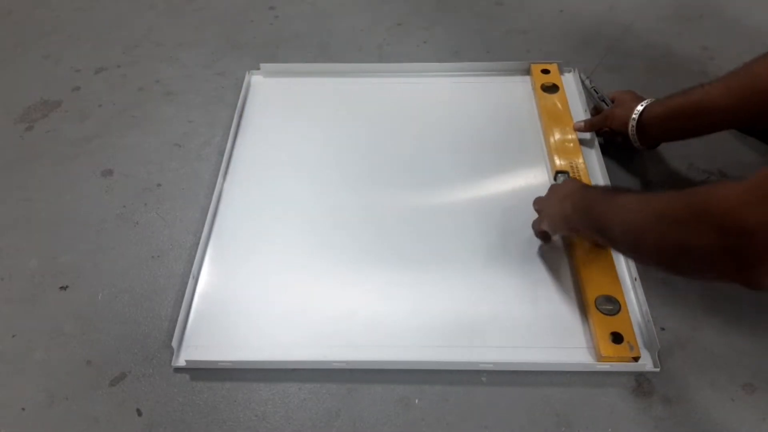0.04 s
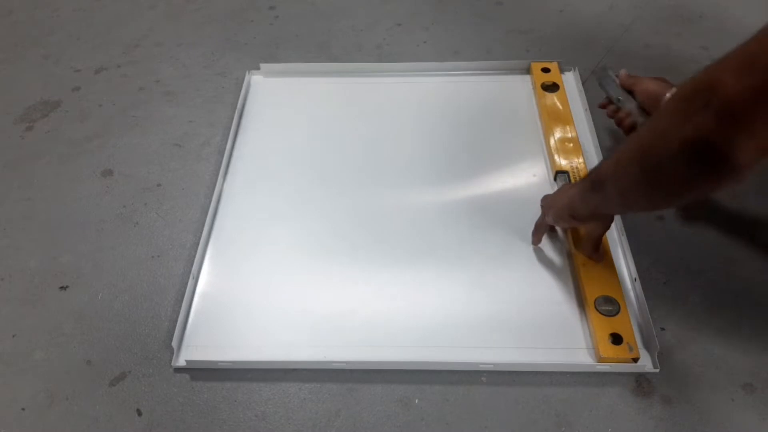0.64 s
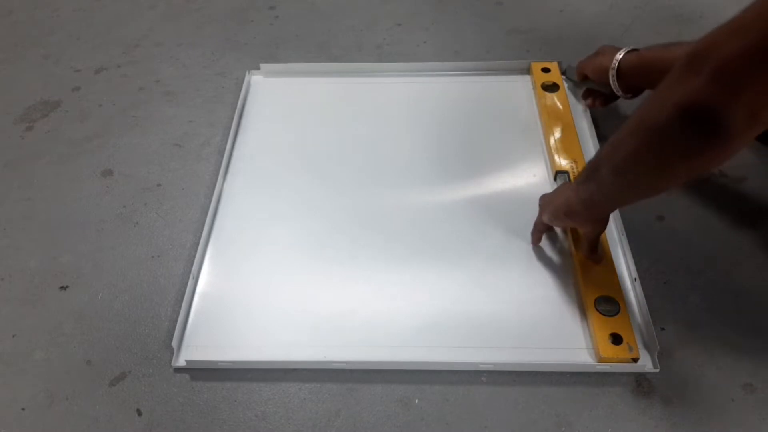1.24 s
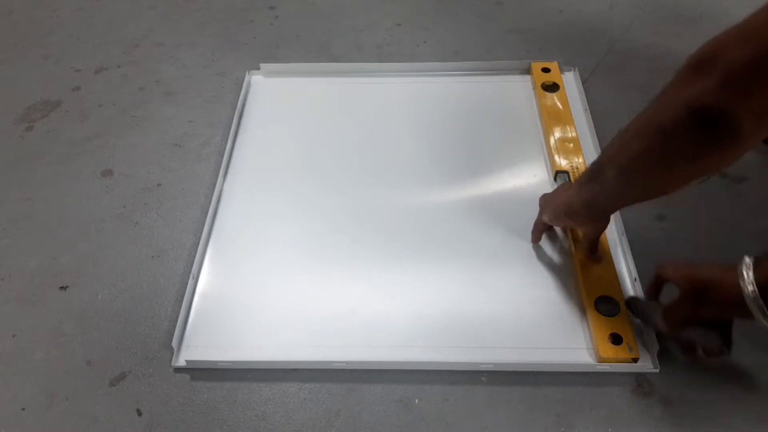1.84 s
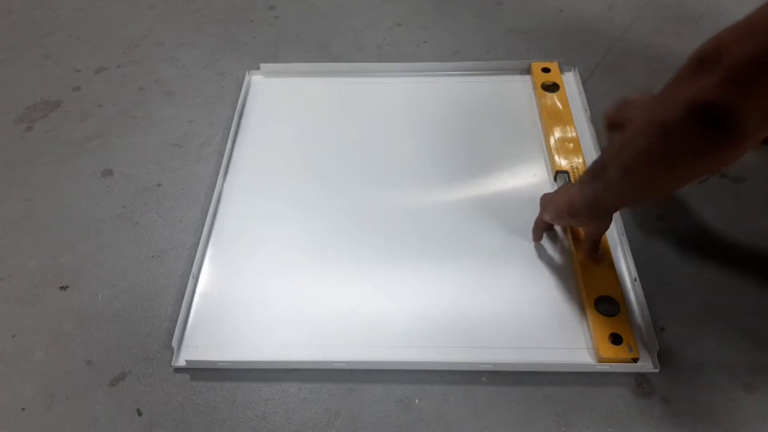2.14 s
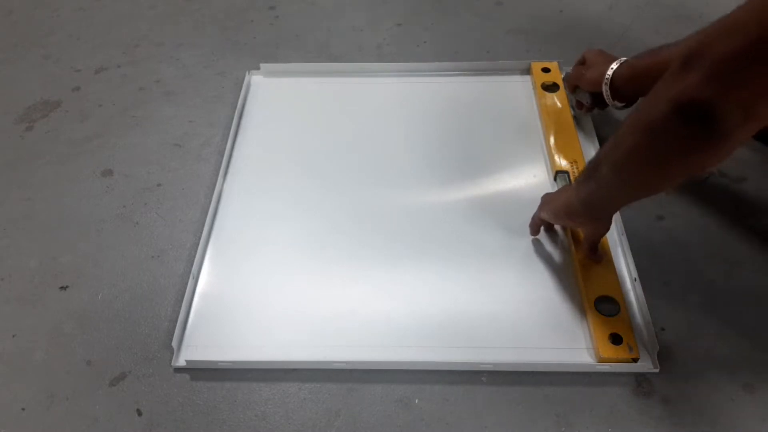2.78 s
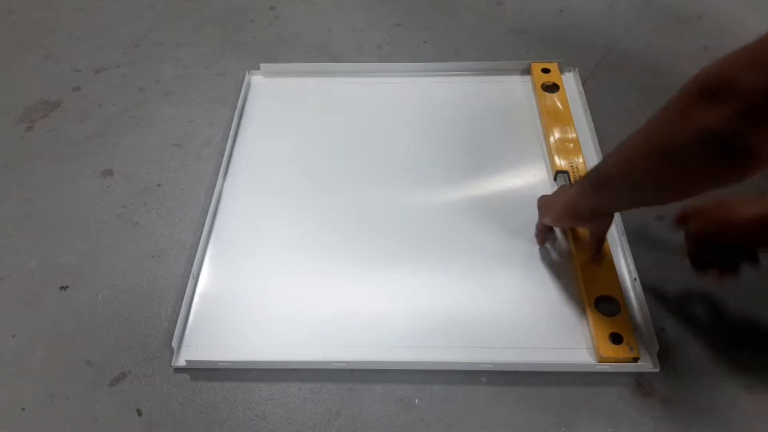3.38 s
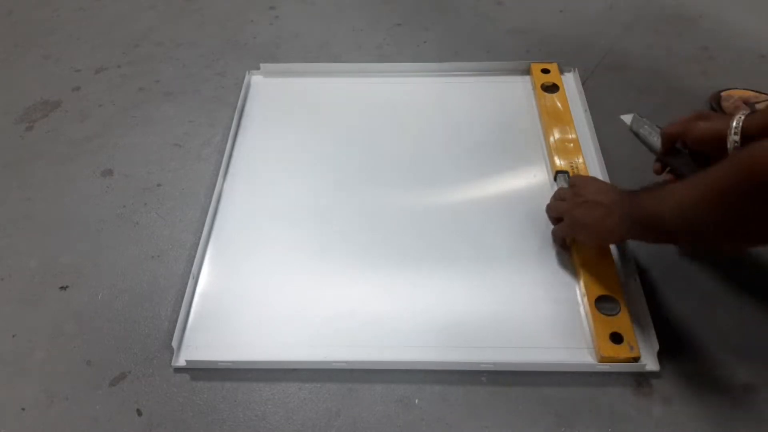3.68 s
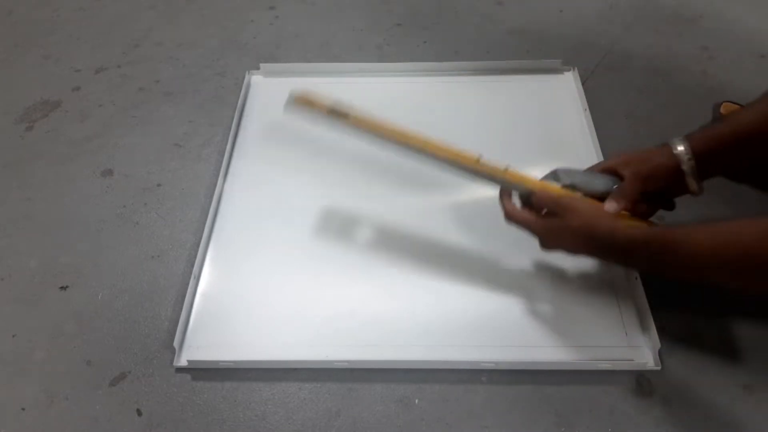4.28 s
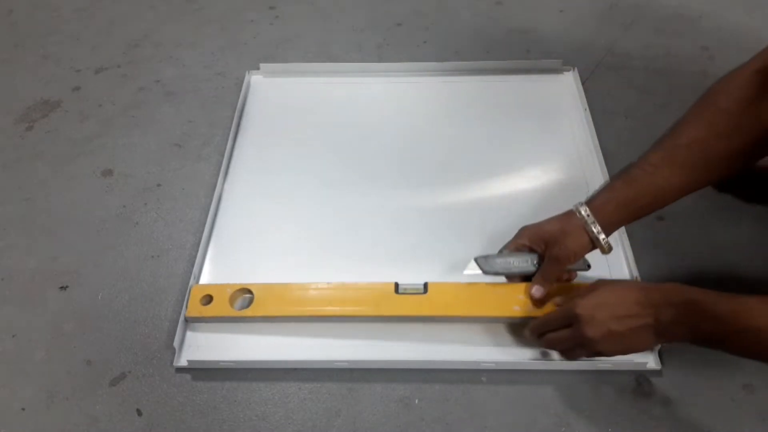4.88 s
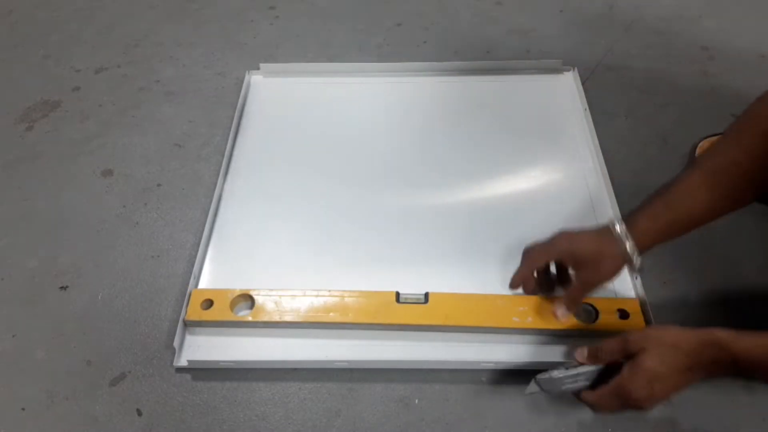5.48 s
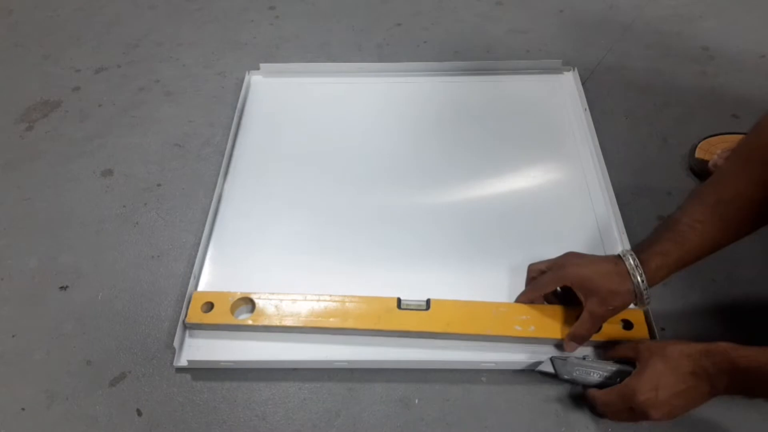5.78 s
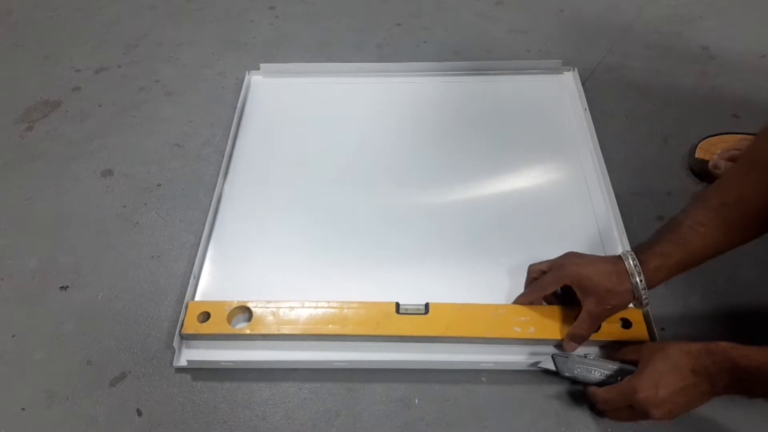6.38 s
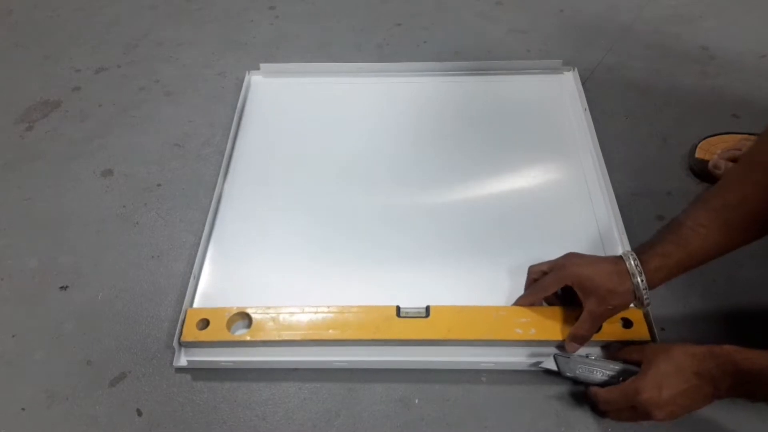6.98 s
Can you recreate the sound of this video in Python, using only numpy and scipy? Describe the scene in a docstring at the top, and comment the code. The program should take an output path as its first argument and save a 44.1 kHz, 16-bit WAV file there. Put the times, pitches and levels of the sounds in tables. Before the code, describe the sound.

A utility knife taps an aluminium panel and scores it with a short grating stroke. After a few more taps comes a second, hissier stroke. A spirit level then slides, clinks against the knife and is laid across the panel with several ringing knocks, followed by faint slides and ticks. The microphones pick up the work directly and with the echo of a hard workshop, where a distant machine hums.

```python
"""A utility knife scores an aluminium panel on the concrete floor of a hard, echoing workshop.
The blade is set down and drawn twice along a spirit level, grating through tiny slips that ring the sheet;
the level is then lifted, clinks against the knife and is laid across the panel. A machine hums far off.
Two spaced microphones hear the work directly and through the room. Table levels are relative."""
import sys
import numpy as np
from scipy import signal
from scipy.fft import rfft, irfft
from scipy.io import wavfile
from scipy.ndimage import uniform_filter1d

SR = 44100
rng = np.random.default_rng(int(sys.argv[2]) if len(sys.argv) > 2 else 0)


def to_wav(sig):
    """Store sig (one row per channel, or 1-D mono) as 16-bit WAV at the path in sys.argv[1].

    Samples outside -1..1 are clipped; the rate is SR.
    """
    pcm = np.clip(np.atleast_2d(sig), -1, 1) * 32767
    pcm = np.round(pcm).astype(np.int16)
    wavfile.write(sys.argv[1], SR, pcm.T)  # frames by channels


N = 318843
T = np.arange(N) / SR
TOP_HZ = 15600


def undb(db):
    """Decibels to gain."""
    return 10 ** (np.asarray(db) / 20)


def rms(x):
    """Root mean square."""
    return np.sqrt(np.mean(x ** 2)) + 1e-12


def lookup(points, hz):
    """Read (f/Hz, value) points on a log-frequency axis."""
    f, value = np.transpose(points)
    return np.interp(np.log(hz + 1e-3), np.log(f), value)


def colour(x, points):
    """Minimum-phase filter through (f/Hz, gain/dB) points."""
    size = 4096
    gain = undb(lookup(points, np.fft.rfftfreq(size, 1 / SR)))
    cepstrum = irfft(np.log(gain))
    cepstrum[1:size // 2] *= 2
    cepstrum[size // 2 + 1:] = 0
    return signal.fftconvolve(x, irfft(np.exp(rfft(cepstrum))))[:len(x)]


def resonate(x, modes):
    """Sum of (f/Hz, width/Hz, gain/dB) resonances driven by x."""
    return sum(undb(db) * signal.lfilter(*signal.iirpeak(hz, hz / width, SR), x)
               for hz, width, db in modes)


def wander(rate_hz):
    """Smooth random drift with a spread near 1."""
    hold = int(SR / rate_hz)
    steps = np.repeat(rng.standard_normal(N // hold + 1), hold)
    return 1.58 * uniform_filter1d(steps, hold)[:N]


def mic_pair(x, lag_ms):
    """Direct sound at the two microphones; it reaches the left one lag_ms later."""
    delay = np.exp(-2j * np.pi * np.fft.rfftfreq(len(x), 1000 / SR) * lag_ms)
    return np.array([irfft(rfft(x) * delay, len(x)), x])


def diffuse(a, b, null_hz=1500):
    """Two unrelated sounds as a diffuse field at the spaced microphones: alike in the bass only."""
    alike = .95 * np.sinc(np.fft.rfftfreq(len(a), 1 / SR) / null_hz)
    mid = rfft(a) * np.sqrt((1 + alike) / 2)
    side = rfft(b) * np.sqrt((1 - alike) / 2)
    return irfft([mid + side, mid - side], len(a))


# spectrum of the room tone: f/Hz, level/dB
ROOM_TONE = [(25, -24.5), (40, -14.5), (62, 2), (110, 7), (160, -1), (300, 0.5), (420, -4), (800, -13),
             (1100, -14), (2000, -19), (4000, -31.5), (8000, -40.5), (15000, -38.5)]
def room_tone():
    """Dull, slightly fluttering rumble from all around the microphones."""
    air = diffuse(*(colour(rng.standard_normal(N), ROOM_TONE) for _ in range(2)))
    return undb(-55 + wander(5.9)) * air / rms(air)


# hum lines of the machine: f/Hz, width/Hz, level/dB
HUM_LINES = [(71, 4.6, -75.5), (98.37, 4.1, -57), (118.8, 8, -65), (189, 3.5, -71.5), (272.1, 12, -63.5)]
def distant_machine():
    """A far-off hum: narrow bands of noise that waver like unsteady tones."""
    hum = 0
    for hz, width, db in HUM_LINES:
        line = rng.standard_normal(N)
        for _ in range(2):
            line = resonate(line, [(hz, width, 0)])
        hum += undb(db) * line / rms(line)
    return hum


# reverberation time of the workshop: f/Hz, T60/s
ROOM_T60 = [(200, 0.52), (530, 0.7), (1400, 0.59), (3700, 0.61), (9000, 0.55), (15000, 0.29)]
def workshop_echo(x, gap_s=0.00051, build_s=0.0042, early_db=-1, early_s=0.012):
    """What the walls return to the microphones: near reflections, then a tail whose treble dies first."""
    t = np.maximum(T[:SR] - gap_s, 0)
    tail = rfft(diffuse(*rng.standard_normal((2, SR))))
    hz = np.fft.rfftfreq(SR, 1 / SR)
    centres = np.geomspace(100, 16000, 12)
    echo = 0
    for centre, share in zip(centres, np.eye(len(centres))):
        band = irfft(tail * np.interp(hz, centres, share), SR)
        echo += band * undb(-60 * t / lookup(ROOM_T60, centre))
    echo *= (1 - np.exp(-t / build_s)) * (1 + undb(early_db) * np.exp(-t / early_s))
    echo /= rms(echo) * np.sqrt(SR)
    return signal.fftconvolve(x[None], echo)[:, :N]


def smear(crack_s, rattle_s, rattle_db):
    """A kick smeared out by bending waves crossing the metal: a brief crack and a weaker rattle."""
    t = T[:SR // 4]
    envelope = t / crack_s * np.exp(-t / crack_s) + undb(rattle_db) * np.exp(-t / rattle_s)
    burst = rng.standard_normal(len(t)) * envelope
    return burst / np.linalg.norm(burst)


def strikes(blows, modes, lag_ms, knee_hz, crack_s, rattle_s, rattle_db, bass_db, direct_db, room_db):
    """Each blow spreads through the metal as a crack, a short rattle and a few clear resonances."""
    direct, to_room = np.zeros((2, N + SR)), np.zeros(N + SR)
    size = SR // 2
    kick = signal.unit_impulse(size)
    body = kick + resonate(kick, modes)
    for (start_s, db, thud, slope), lag in zip(blows, np.broadcast_to(lag_ms, len(blows))):
        # a flat contact thuds, though thin metal radiates little bass; a soft one loses treble
        lows = [(90, thud + bass_db), (250, thud), (520, thud - 1), (850, 0)]
        highs = [(knee_hz, 0), (TOP_HZ, slope * np.log2(TOP_HZ / knee_hz))]
        ring = undb(db) * colour(body, lows + highs)
        toward, around = (signal.fftconvolve(ring, smear(crack_s, rattle_s, rattle_db))[:size]
                          for _ in range(2))
        span = slice(int(start_s * SR), int(start_s * SR) + size)
        direct[:, span] += mic_pair(toward, lag)
        # the room gathers what leaves in all directions, so it hears a more even spectrum
        to_room[span] += ring + undb(-10) * around
    return undb(direct_db) * direct[:, :N] + undb(room_db) * workshop_echo(to_room[:N])


# the hand leaning on the panel: t/s, level/dB, thud/dB, treble slope/(dB per octave)
PINGS = [(5.548, -54, -10, -15), (6.945, -56, -3, -9)]
# resonances of the ping: f/Hz, width/Hz, gain/dB
PING_MODES = [(750, 23, -2), (873, 27, 24.5)]
def panel_pings():
    """The panel pings dully under the weight of the hand."""
    return strikes(PINGS, PING_MODES, lag_ms=.1, knee_hz=1200, crack_s=0.0023, rattle_s=0.0092,
                   rattle_db=-20, bass_db=-20, direct_db=34, room_db=36.5)


# light clicks: t/s, level/dB, thud/dB, treble slope/(dB per octave)
TICKS = [(.066, -52, 3, -9.5), (.129, -56.5, -9, -9.5), (.147, -58, 3, -5), (.187, -57.5, -1, -4),
         (.361, -60.5, 5, -2.9), (.404, -58, 6, -2.5), (.451, -44, -5, -6.5), (.48, -49, -1.5, -1.2),
         (1.192, -52.5, 2, -1), (1.967, -51.5, 3, -1), (2.895, -39.5, -4, 1), (5.245, -59, -14, 1.5),
         (5.318, -52, 2, -3.5)]
# resonances of the small steel parts: f/Hz, width/Hz, gain/dB
STEEL_MODES = [(3800, 54, 3.5), (8200, 700, -14.5), (12400, 1600, -6)]
def steel_ticks():
    """The knife and a metal bracelet click with a thin, high ring."""
    return strikes(TICKS, STEEL_MODES, lag_ms=0.14, knee_hz=2100, crack_s=0.00086, rattle_s=.006,
                   rattle_db=-20.5, bass_db=-31.5, direct_db=37.5, room_db=37.5)


# contacts of the lifted spirit level: t/s, level/dB, thud/dB, treble slope/(dB per octave)
CLINKS = [(3.921, -42.5, 2, -13), (3.935, -50, 6, -11), (3.95, -54.5, -13.5, -23), (4.203, -30, 1.5, -3)]
# its resonances when held free: f/Hz, width/Hz, gain/dB
FREE_LEVEL_MODES = [(346, 120, -7.5), (1218, 23, 12.5), (1360, 23, 12), (1505, 18, 12.5), (1835, 145, 6),
                    (1980, 33, 10.5), (3085, 320, 7.5), (4700, 80, -3.5), (5400, 90, -3)]
def level_clinks():
    """The spirit level rings free as it comes off the rim and then meets the knife."""
    return strikes(CLINKS, FREE_LEVEL_MODES, lag_ms=0.078, knee_hz=1800, crack_s=0.0029, rattle_s=0.0089,
                   rattle_db=-18, bass_db=-27, direct_db=34, room_db=34.5)


# knocks on the panel: t/s, level/dB, thud/dB, treble slope/(dB per octave), left microphone lag/ms
KNOCKS = [(3.419, -53, -3, -7.5, 0.11), (3.779, -41.5, -2, -11, 0.14), (4.542, -25, -9, -3, -0.15),
          (4.62, -32, -8, -4, 0.054), (4.998, -29.5, -1.5, -3, 0.15), (5.069, -19, -2.5, -5.5, .15),
          (5.123, -29.5, -4, -6, -0.026), (5.131, -28, -9.5, -6, 0.018), (5.5, -42, -5.5, -7, 0.056),
          (5.548, -51.5, -2, -4, 0.13), (5.765, -52, -6, -10, 0.14), (5.834, -53.5, -11, -10, 0.11)]
# resonances of the spirit level lying on the panel: f/Hz, width/Hz, gain/dB
RESTING_LEVEL_MODES = [(190, 40, 1.5), (240, 31, 2), (325, 61, 2), (544, 14, 6.5), (825, 32, -2),
                       (944, 13, 3), (1194, 55, 3.5), (1310, 22, 9.5), (1485, 103, 6), (1622, 33, -3.5),
                       (1854, 180, 1), (2302, 15, 3.5)]
def level_knocks():
    """The spirit level knocks on the panel at spots to the left and right of the microphones."""
    blows, lags = [row[:-1] for row in KNOCKS], [row[-1] for row in KNOCKS]
    return strikes(blows, RESTING_LEVEL_MODES, lag_ms=lags, knee_hz=1980, crack_s=0.0018, rattle_s=0.01,
                   rattle_db=-15.5, bass_db=-17.5, direct_db=33, room_db=36.5)


# the blade touching down: t/s, level/dB, thud/dB, treble slope/(dB per octave)
TAPS = [(1.013, -26, -7, -0.8), (1.281, -36, -7.5, -6), (2.295, -39.5, -5, -4.5), (2.58, -39, -1.5, -8.5),
        (2.665, -37, -3, -8)]
# resonances of the sheet, tapped or scraped: f/Hz, width/Hz, gain/dB
SHEET_MODES = [(828, 70, -4.5), (1290, 74, -5), (1635, 45, -10), (1827, 70, -1.5), (2100, 50, -1.5),
               (2350, 60, -2.5), (2845, 170, -6), (3650, 36, -5), (4270, 39, -16), (6700, 28, -6.5),
               (8070, 140, -2)]
def blade_taps():
    """The blade is set down and rings the sheet."""
    return strikes(TAPS, SHEET_MODES, lag_ms=.13, knee_hz=2000, crack_s=.0012, rattle_s=0.012,
                   rattle_db=-14, bass_db=-22, direct_db=34, room_db=38)


def stroke(start_s, attack_s, hold_s, db, lows_db, highs_db, response, release_s):
    """Gains of lows, mids and highs: the hand presses, speeds up, slows down and lets go."""
    slack = np.maximum(start_s - T, 0) / attack_s + np.maximum(T - start_s - hold_s, 0) / release_s
    pressure = undb(db - 30 * np.minimum(slack, 10))  # 30 dB per attack or release time
    travel = np.clip((T - start_s) / hold_s, 0, 1)
    speed = np.sin(np.pi * travel)
    return pressure * undb([band_db + travel_db * travel + speed_db * speed
                            for band_db, (travel_db, speed_db) in zip([lows_db, 0, highs_db], response)])


# bending waves returning from the four folded rims: delay/ms, level/dB
RIM_ECHOES = [(1.3, -15.5), (2.2, -10.5), (3.4, -8.5), (4.9, -13)]
def scrape(gains, tone, slips_hz, scatter_db, chatter_db, lag_ms, direct_db, room_db):
    """Metal catches and slips at random; each slip kicks the sheet, and the pressure chatters."""
    slipping = rng.random(N) < slips_hz / SR
    direction, size = rng.standard_normal((2, N))
    slips = slipping * np.sign(direction) * undb(scatter_db * np.minimum(size, 1.3))
    slips *= undb(chatter_db * np.tanh(wander(130)))
    kicks = slips.copy()
    for ms, db in RIM_ECHOES:
        # the paths to the rims change as the contact travels, so their echoes sweep the timbre
        delay = np.round(ms * (1 + .12 * wander(5)) * SR / 1000).astype(int)
        kicks += undb(db) * slips[(np.arange(N) - delay) % N]
    ring = colour(kicks + resonate(kicks, SHEET_MODES), tone)
    sound = 0
    for gain, (edge_hz, kind) in zip(gains, [(1200, "low"), ([1200, 3200], "band"), (3200, "high")]):
        band = signal.sosfiltfilt(signal.butter(3, edge_hz, kind, fs=SR, output="sos"), ring)
        sound += gain * band / rms(band)
    return undb(direct_db) * mic_pair(sound, lag_ms) + undb(room_db) * workshop_echo(sound)


# a soft knock, then light slides: full contact t/s, attack/s, hold/s, level/dB, relative lows/dB, highs/dB
KNOCK_AND_SLIDES = [(3.5, 0.022, 0.024, -46, -6, -10), (3.722, 0.024, 0.013, -46, -16, -9),
                    (3.875, 0.14, 0.047, -47.5, -5, -1), (5.615, .1, 0.024, -56, 2, -2.5),
                    (5.73, 0.13, 0.094, -57.5, 0, -7.5), (6.05, 0.15, 0.056, -54.5, 2.5, -5.5),
                    (6.94, 0.083, 0.053, -52.5, 8.5, -4)]
# lows, mids and highs along each contact: change from start to end/dB, gain at full speed/dB
CONTACT_RESPONSE = [(-6.5, 0.61), (-2, .5), (1.5, .5)]
# colour of a flat face on the sheet: f/Hz, gain/dB
FLAT_FACE_TONE = [(100, -11), (400, -0.5), (850, 0), (1400, 5), (2200, 0), (3500, -7), (7000, -15),
                  (15000, -20)]
def knock_and_slides():
    """A soft knock, then the level and knife sliding lightly over the sheet."""
    gains = sum(stroke(*row, CONTACT_RESPONSE, release_s=.075) for row in KNOCK_AND_SLIDES)
    return scrape(gains, FLAT_FACE_TONE, slips_hz=1456, scatter_db=2.5, chatter_db=2.5,
                  lag_ms=-0.045, direct_db=-5.5, room_db=-5.5)


# blade strokes: full contact t/s, attack/s, hold/s, level/dB, lows/dB and highs/dB relative to it
CUTS = [(1.53, .1, 0.27, -20.5, -11.5, -9), (2.89, .11, 0.24, -21.5, -11, -5.5)]
# lows, mids and highs along a cut: change from start to end/dB, gain at full speed/dB
CUT_RESPONSE = [(-7, -5), (-8, 1.5), (0, 7.5)]
# colour of the grating edge: f/Hz, gain/dB
GRATE_TONE = [(100, -28.5), (300, -17.5), (550, -19), (800, -12.5), (1200, -5.5), (1750, 2), (2400, 1),
              (3500, -6), (5500, -10.5), (8000, -16), (10000, -16.5), (13000, -18), (16000, -29)]
# dip while the blade skates: lows/dB, mids/dB, highs/dB
SKATE_DIP = [-6, -14, -3.5]
def knife_cuts(skate_at_s=3.064, skate_half_s=0.032, rebite=0.46):
    """The edge grates through the aluminium: a fast blade hisses, a slow one growls."""
    gains = sum(stroke(*row, CUT_RESPONSE, release_s=0.13) for row in CUTS)
    # midway through the second stroke the blade skates, then bites harder
    since = (T - skate_at_s) / skate_half_s
    skate = np.exp(-since ** 2) - rebite * np.exp(-(since - 2) ** 2)
    gains *= undb(np.outer(SKATE_DIP, skate))
    return scrape(gains, GRATE_TONE, slips_hz=1788, scatter_db=4.5, chatter_db=4,
                  lag_ms=0.13, direct_db=-4.5, room_db=-3.5)


def scene():
    """The work on the floor and the room behind it, as they reach the microphones."""
    work = knife_cuts() + knock_and_slides()
    work += blade_taps() + steel_ticks() + level_knocks() + level_clinks() + panel_pings()
    return work + room_tone() + distant_machine()


def record(dry):
    """The left microphone is weaker and duller; both round off sharp peaks, and the top is cut."""
    left = colour(dry[0], [(100, -2.5), (1000, -2.0), (4000, -0.9), (8500, 0.8), (13000, -1.0)])
    right = colour(dry[1], [(100, 1.0), (8500, 3.5), (13000, 5.45)])
    rounded = .6 * np.tanh(np.array([left, right]) / .6)
    return signal.sosfilt(signal.ellip(10, .2, 70, TOP_HZ, fs=SR, output="sos"), rounded)


dry = scene()
out = record(dry)
to_wav(out)
```